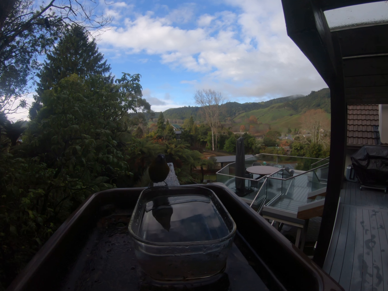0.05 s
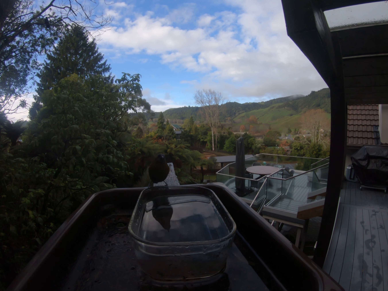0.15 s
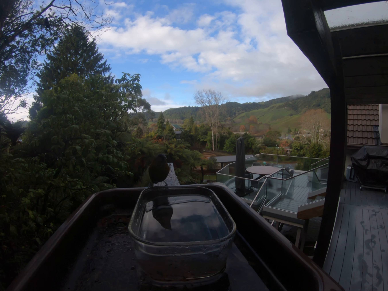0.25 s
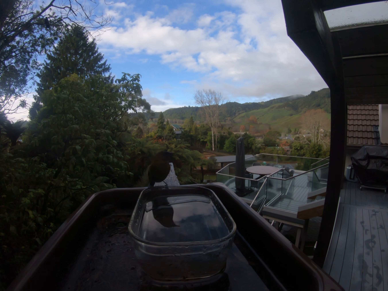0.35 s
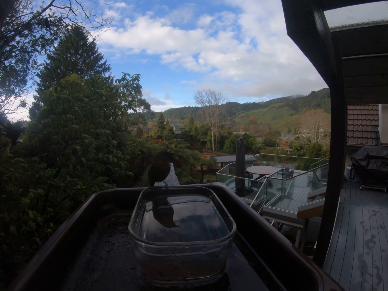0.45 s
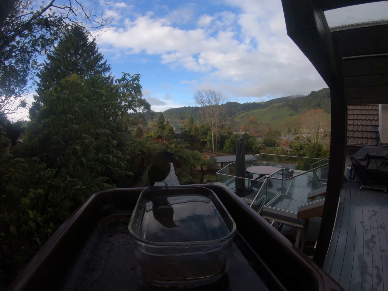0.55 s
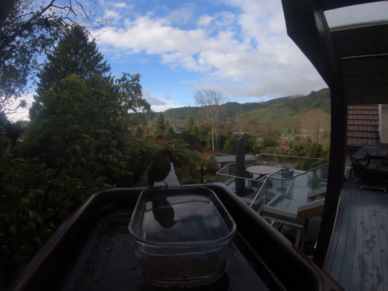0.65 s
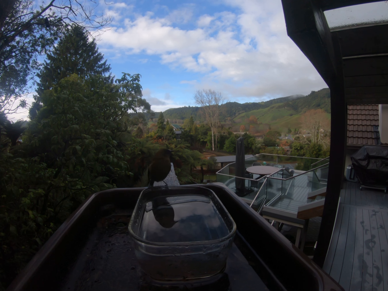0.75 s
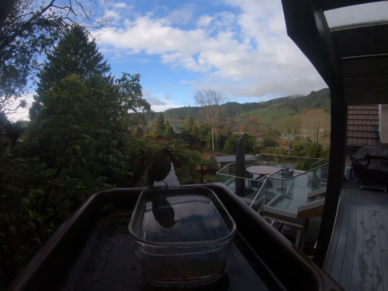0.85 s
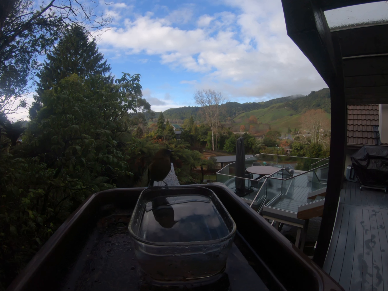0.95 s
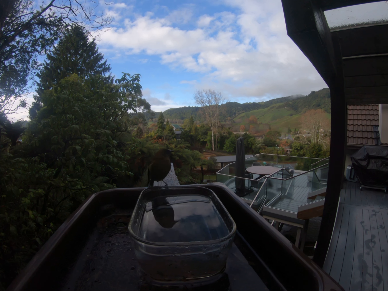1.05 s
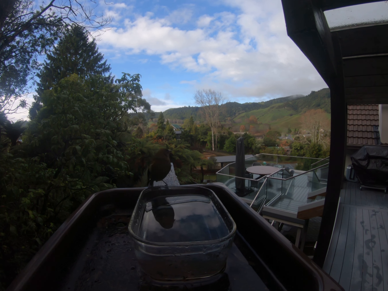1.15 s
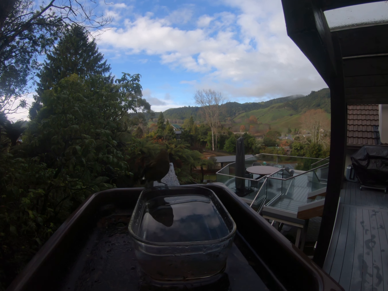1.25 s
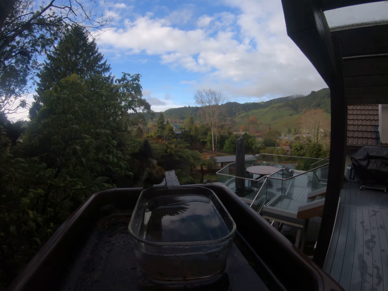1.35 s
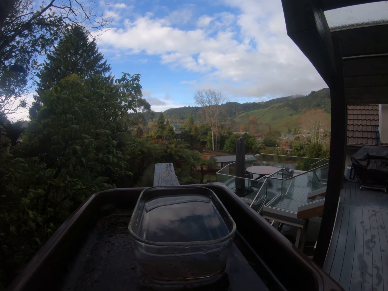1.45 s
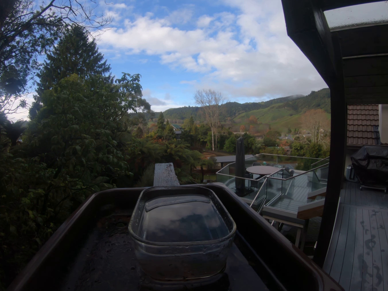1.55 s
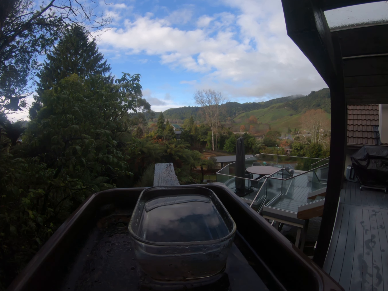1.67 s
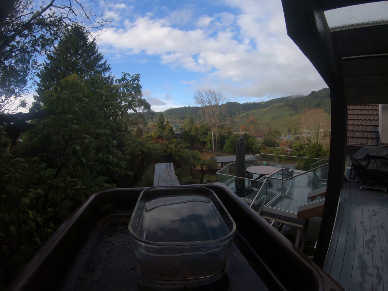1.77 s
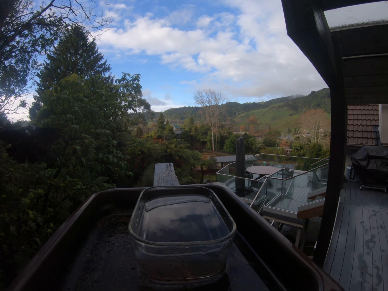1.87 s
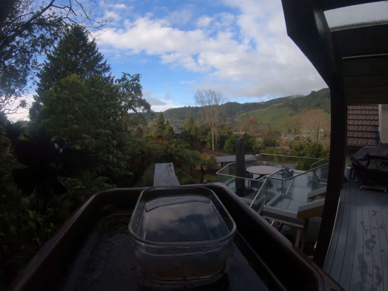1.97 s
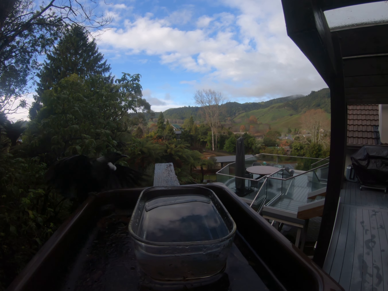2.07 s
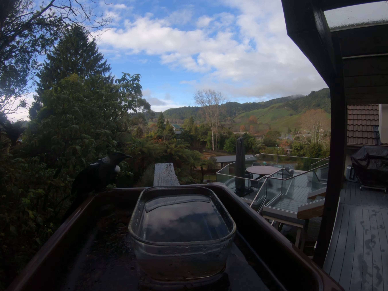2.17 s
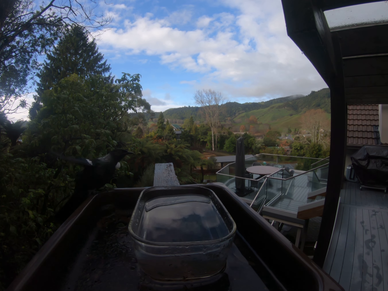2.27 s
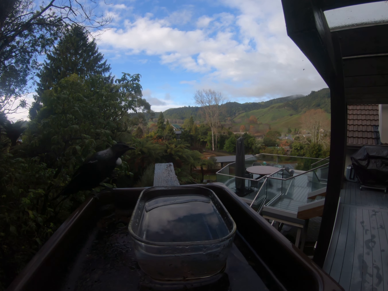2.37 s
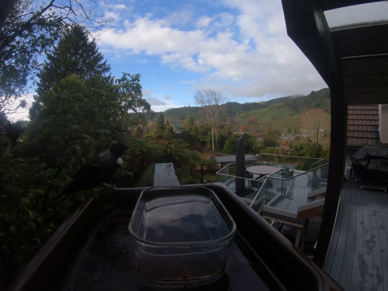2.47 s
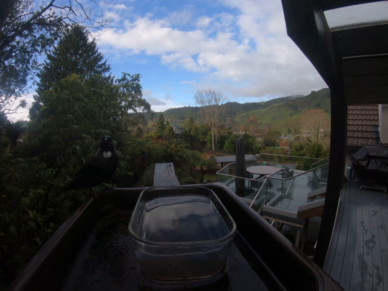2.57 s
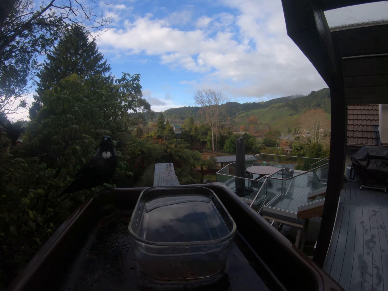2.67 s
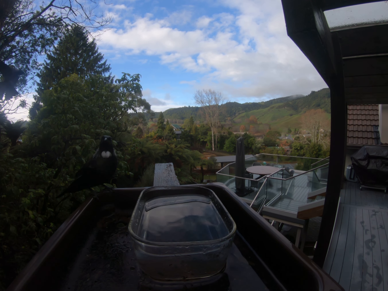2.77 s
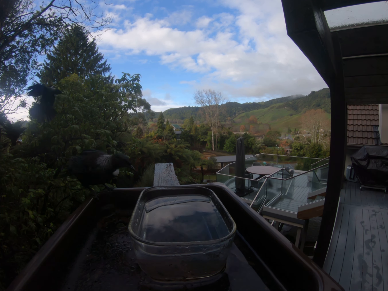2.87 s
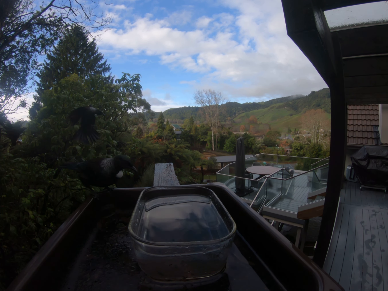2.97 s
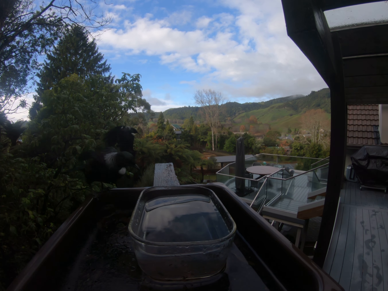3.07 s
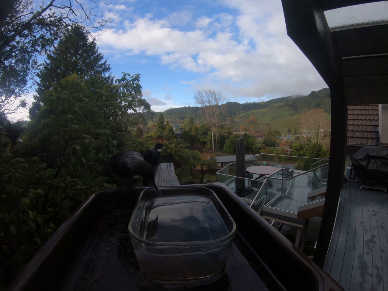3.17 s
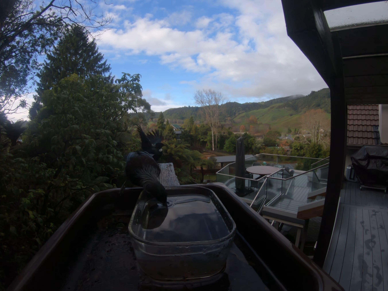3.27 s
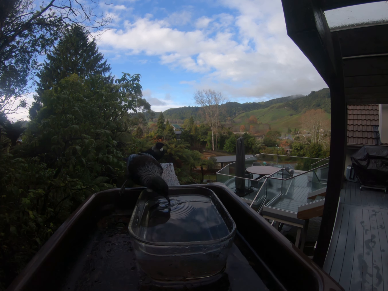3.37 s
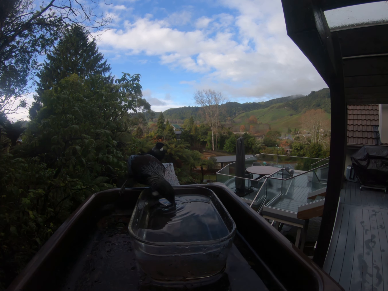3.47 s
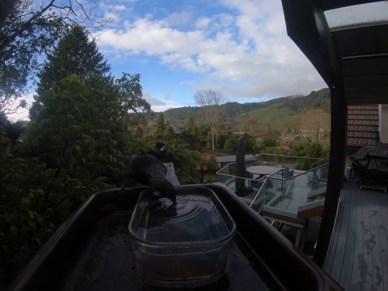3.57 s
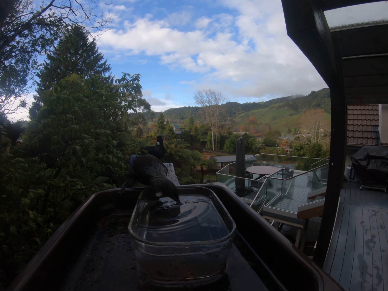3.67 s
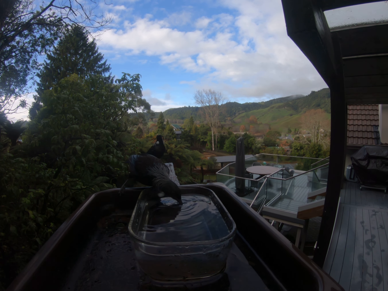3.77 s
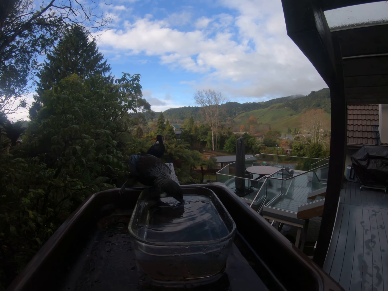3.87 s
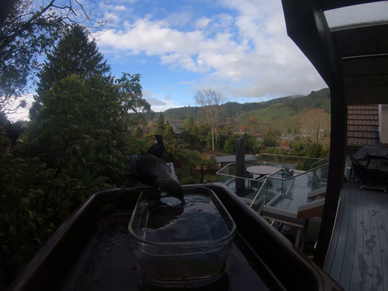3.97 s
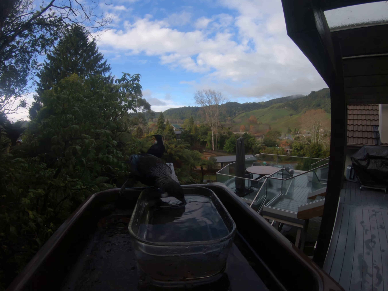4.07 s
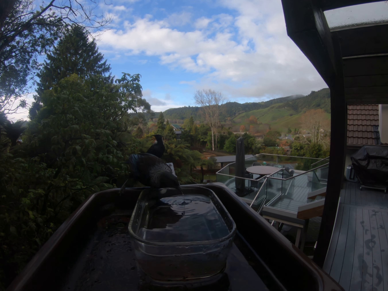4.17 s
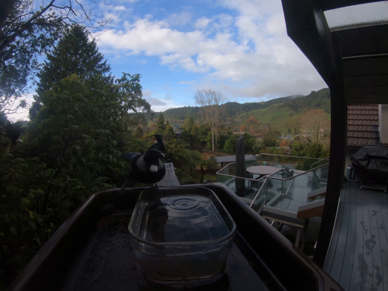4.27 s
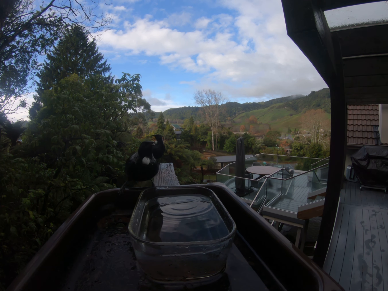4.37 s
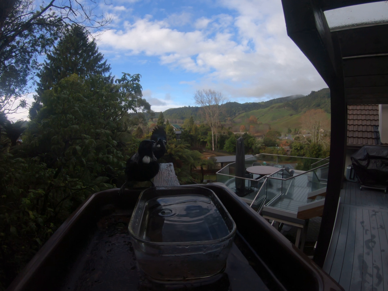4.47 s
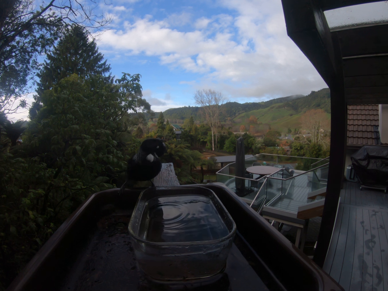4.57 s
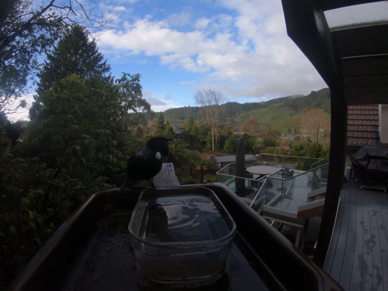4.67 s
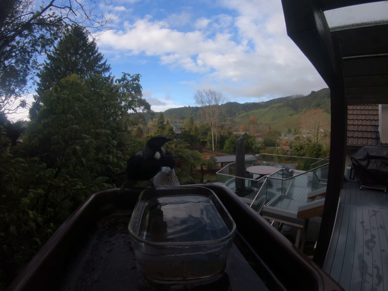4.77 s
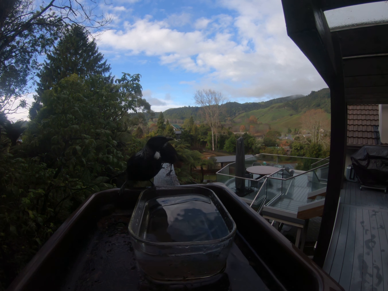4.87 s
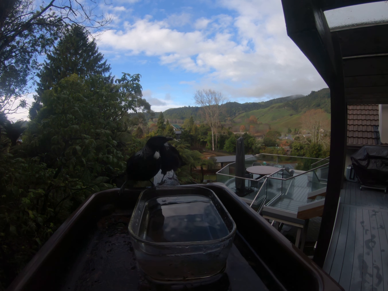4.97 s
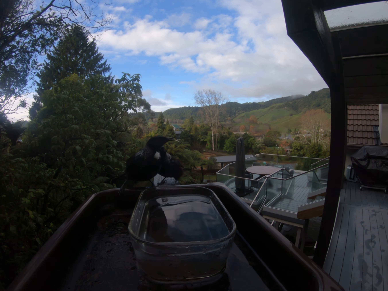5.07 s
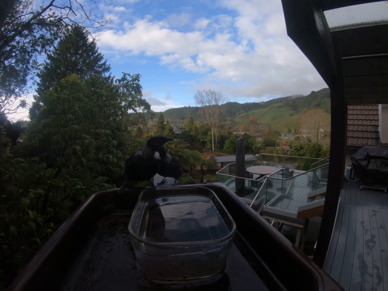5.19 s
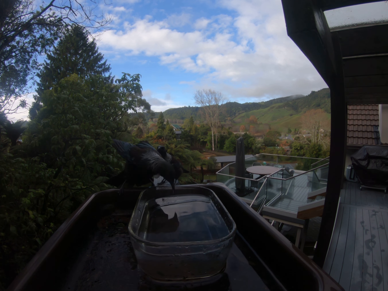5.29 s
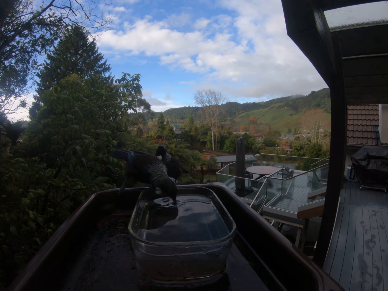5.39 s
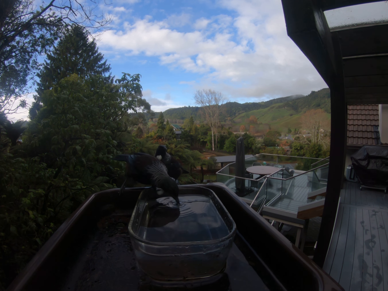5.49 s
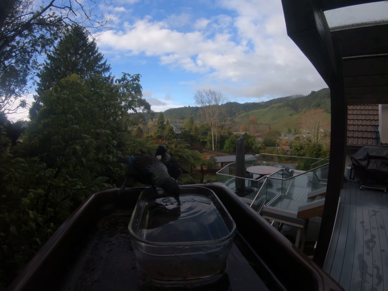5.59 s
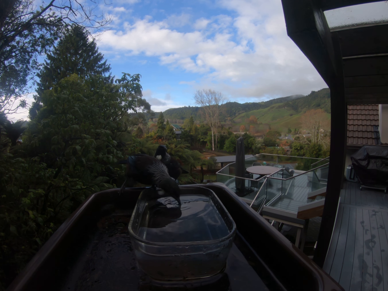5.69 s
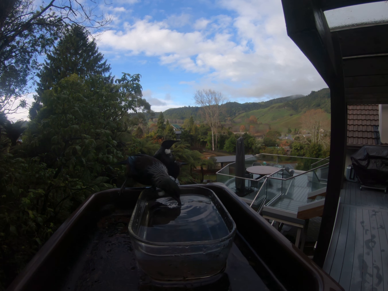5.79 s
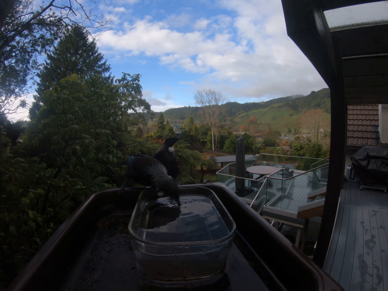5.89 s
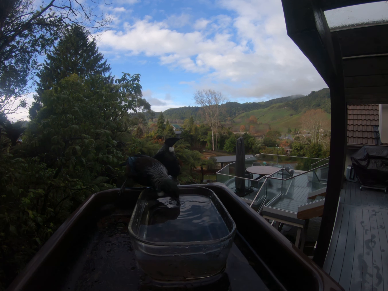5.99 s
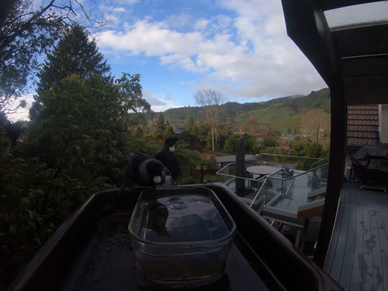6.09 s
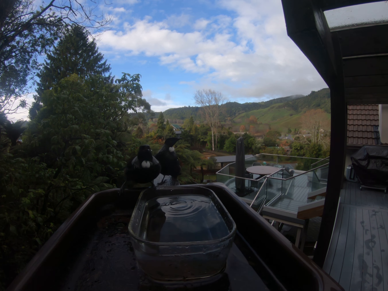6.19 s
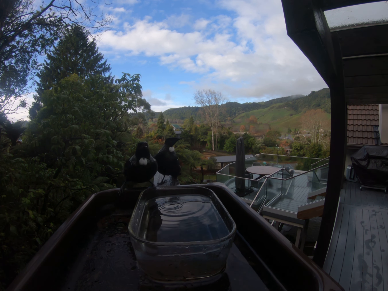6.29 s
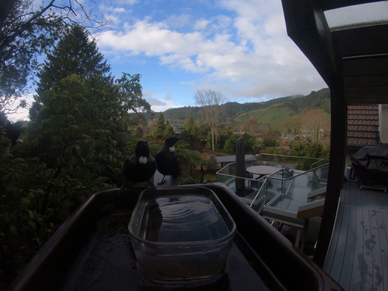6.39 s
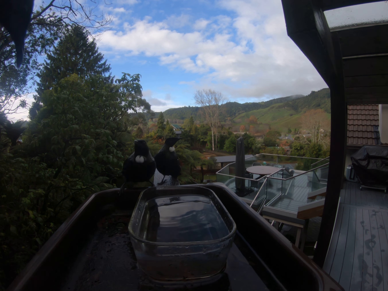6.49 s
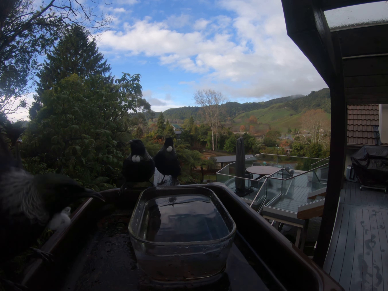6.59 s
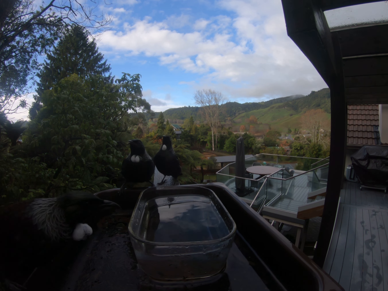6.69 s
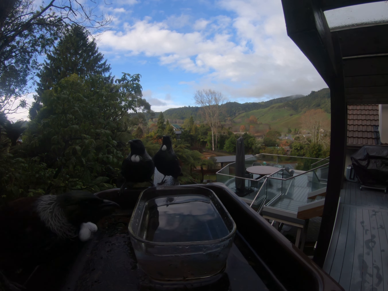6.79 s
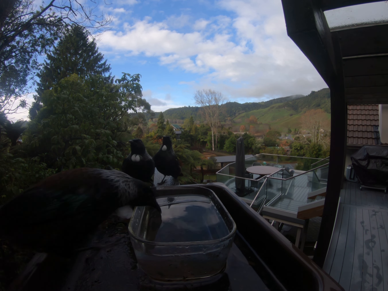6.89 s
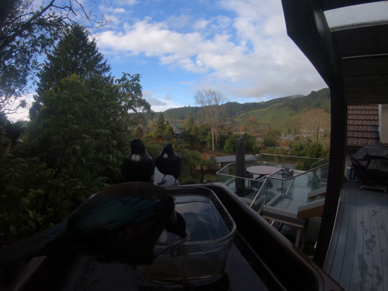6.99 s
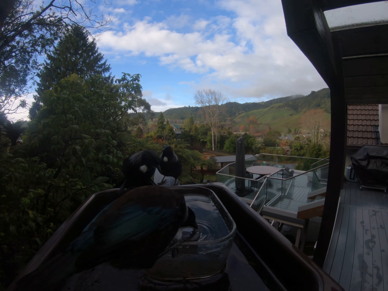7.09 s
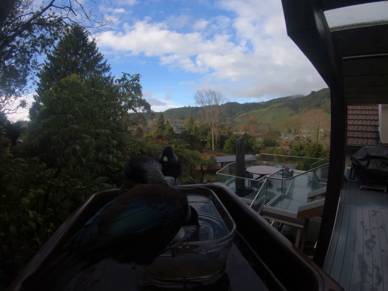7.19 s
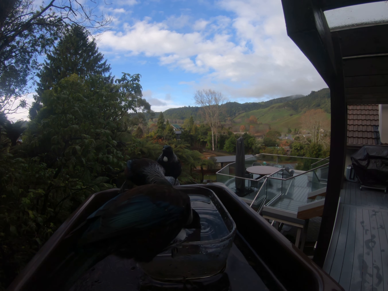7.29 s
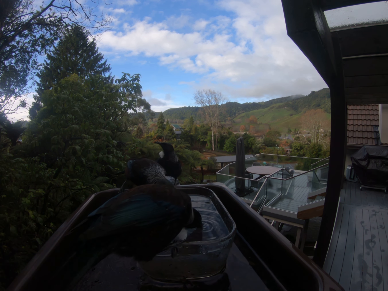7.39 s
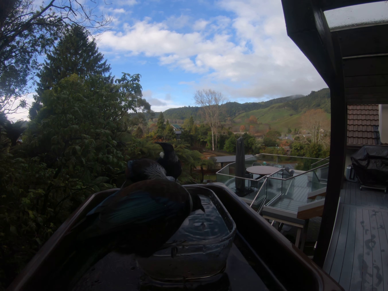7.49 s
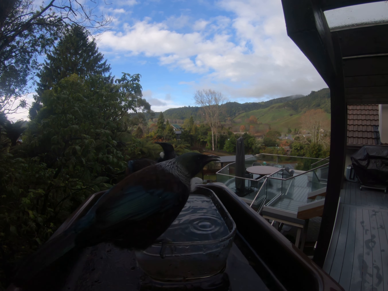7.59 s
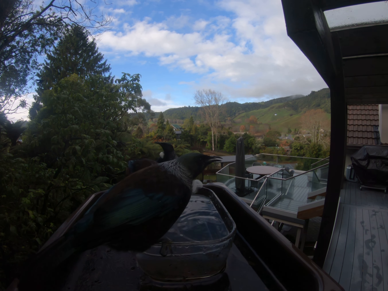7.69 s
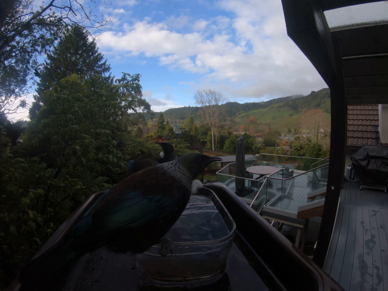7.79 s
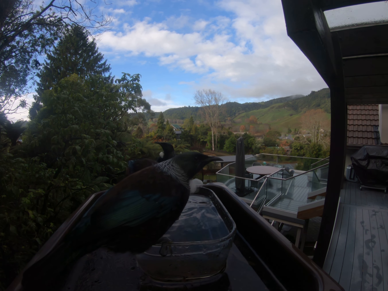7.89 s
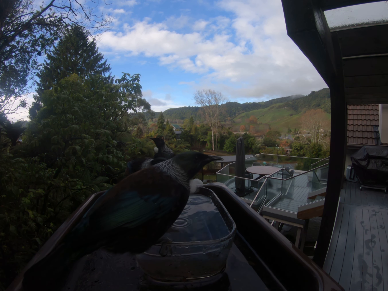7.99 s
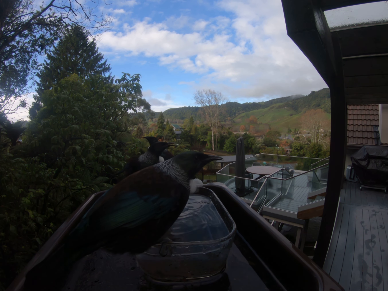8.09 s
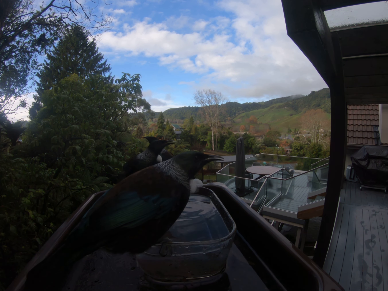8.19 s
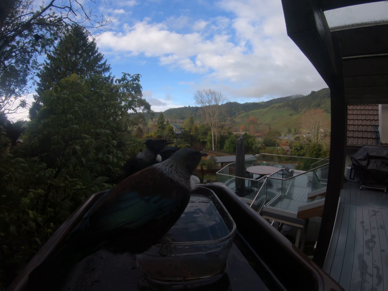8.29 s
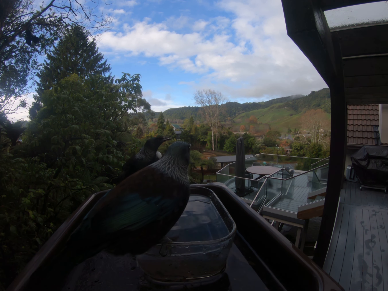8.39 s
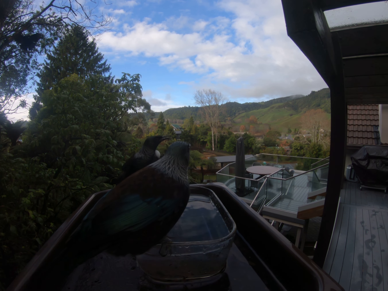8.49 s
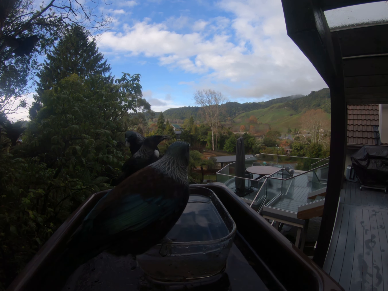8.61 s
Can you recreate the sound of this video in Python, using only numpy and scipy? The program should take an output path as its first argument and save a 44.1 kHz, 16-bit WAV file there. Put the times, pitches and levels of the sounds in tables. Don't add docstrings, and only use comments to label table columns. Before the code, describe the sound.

Very close to a feeder on a quiet wooden deck, faint leaf rustle and thin far peeps. A bird bursts away with feathery wing strokes, foot knocks and quick falling chips. Others flutter in, buffet the microphone and land with thumps. Beaks click and lap rapidly. A wing slaps the microphone with a loud crack, then claws scrape, slow sips continue and far birds flute and shrill.

```python
import sys
import numpy as np
from scipy import signal
from scipy.fft import rfft, irfft, next_fast_len
from scipy.io import wavfile
from scipy.ndimage import uniform_filter1d, map_coordinates

SR = 44100
rng = np.random.default_rng(int(sys.argv[2]) if len(sys.argv) > 2 else 0)


def to_wav(sig):
    pcm = np.clip(np.atleast_2d(sig), -1, 1) * 32767
    pcm = np.round(pcm).astype(np.int16)
    wavfile.write(sys.argv[1], SR, pcm.T)


def gain_from_db(level_db):
    decades = np.asarray(level_db, float) / 20
    return 10 ** decades


N = 381465
T = np.arange(N) / SR


def unit(x):
    return x / np.sqrt(np.mean(x ** 2) + 1e-20)


def along(points, f_hz):
    f, value = np.transpose(points)
    return np.interp(np.log(f_hz + 1), np.log(f + 1), value)


def sides(pan_db):
    return gain_from_db(np.array([pan_db / 2, -pan_db / 2]))


def wobble(rate_hz):
    return map_coordinates(rng.standard_normal(int(N * rate_hz / SR) + 4), [T * rate_hz])


def rush(spectrum, alike, patchy_db):
    z = signal.stft(rng.standard_normal((2, N)), nperseg=256)[2]
    field = uniform_filter1d(rng.standard_normal(z.shape[1:]), size=5, axis=0)
    field = uniform_filter1d(field, size=6, axis=1)
    pair = signal.istft(z * gain_from_db(patchy_db * np.tanh(unit(field))), nperseg=256)[1][:, :N]
    m = next_fast_len(N)
    f_hz = np.fft.rfftfreq(m, 1 / SR)
    turn = np.arccos(np.clip(along(alike, f_hz), -1, 1)) / 2
    gain = gain_from_db(along(spectrum, f_hz)) * [np.cos(turn), np.sin(turn)]
    mid, side = irfft(rfft(pair, m) * gain, m)[:, :N]
    return unit(np.array([mid + side, mid - side]))


def add(out, t_s, sound):
    i = round(t_s * SR)
    out[:, i:i + sound.shape[-1]] += sound[..., :N - i]


def ring(f_hz, t60_s, t, attack_s, lead_rad=0):
    return np.sin(2 * np.pi * f_hz * t + lead_rad) * gain_from_db(-60 * t / t60_s) * (1 - np.exp(-t / attack_s))


def swells(rows, rise_db_s):
    gain = 0
    for s, hold, db, fall_db_s in rows:
        before, after = np.clip(s - T, 0, None), np.clip(T - s - hold, 0, None)
        gain = gain + gain_from_db(db - rise_db_s * before - fall_db_s * after)
    return uniform_filter1d(gain, size=300)


# t/s, stir of leaves and feathers level/dB, breeze level/dB
AIR = [(0, -73, -69.5), (1.15, -68, -68), (1.45, -63.5, -68.5), (1.75, -57, -59.5), (2.25, -56, -64),
       (2.75, -65, -68.5), (3.2, -52.5, -51.5), (3.5, -63, -73.5), (4.1, -61, -68), (4.72, -53.5, -71),
       (4.87, -70.5, -71.5), (5.65, -69, -72.5), (5.9, -57.5, -67.5), (6.15, -67.5, -70.5),
       (6.55, -64.5, -66.5), (6.821, -72, -75), (7.019, -64, -66.5), (8.65, -60.5, -60.5)]
# f/Hz, level/dB per Hz
RUSTLE = [(1060, -3.5), (1800, -2), (2260, 0), (4410, -0.5), (5590, -6.5), (7910, -4), (10400, -21),
          (13000, -40.5)]
# f/Hz, level/dB per Hz
VALLEY = [(190, -13.5), (320, -6), (491, -8), (711, 0), (970, -4.5), (2200, -16), (2860, -47.5),
          (4840, -120)]
# f/Hz, level/dB per Hz
HUM = [(20, -26), (52, -19), (80, -40), (115, -38), (138, -8), (180, 0), (300, -9), (480, -45)]
# f/Hz, left-right likeness
ALIKE_FAR = [(60, 0.38), (200, 0.88), (640, -0.62), (3100, 0.44), (8000, -0.47)]


def background():
    s, *cols = np.transpose(AIR)
    stir_db, breeze_db = (np.interp(T, s, c) for c in cols)
    hum_db = breeze_db + 3.5 + 0.083 * (stir_db - breeze_db)
    leaves = gain_from_db(stir_db + 1.5 + 1.8 * wobble(12)) * rush(RUSTLE, ALIKE_FAR, patchy_db=4.5)
    valley = gain_from_db(breeze_db + 3.5 + 1.5 * wobble(11)) * rush(VALLEY, ALIKE_FAR, patchy_db=2)
    hum = gain_from_db(hum_db + 1.5 * wobble(8)) * rush(HUM, ALIKE_FAR, patchy_db=3)
    return leaves + valley + hum


# f/Hz, level/dB per Hz
SHEEN = [(6000, -43), (8500, 0), (11000, -1.5), (15500, -11), (16500, -38)]
# f/Hz, left-right likeness
ALIKE_NEAR = [(60, -0.19), (250, 1), (1410, -0.053), (3100, 0.67), (10000, -0.66)]


def sheen():
    calm_db, growth = -62, 1.8
    s, stir_db, _ = np.transpose(AIR)
    late_db = -20 * (T > 6.78)
    level_db = -76.5 + late_db + growth * (np.interp(T, s, stir_db) - calm_db) + 2 * wobble(13)
    return gain_from_db(level_db) * rush(SHEEN, ALIKE_NEAR, patchy_db=0.5)


# t/s, peak level/dB, f/Hz
CLICKS = [(.158, -60, 3800), (2.204, -38, 8450), (2.3765, -38.5, 5370), (3.155, -42, 7500),
          (3.196, -39, 7300), (3.226, -45, 6200), (3.244, -31.5, 2810), (3.245, -38, 8000),
          (3.27, -48, 7300), (3.59, -55, 7000), (3.662, -57, 7000), (2.387, -44, 8200), (3.5159, -54, 4500),
          (3.574, -55, 7300), (3.7814, -45, 2870), (4.122, -49, 7600), (4.133, -52, 2500),
          (5.3687, -47, 2880), (5.457, -56, 5000), (5.5373, -49, 6200), (5.5967, -52.5, 2430),
          (5.613, -48.5, 4400), (5.698, -49, 4940), (5.74, -50, 3100), (5.7726, -52, 4510),
          (5.844, -44, 4530), (5.884, -50, 2400), (5.888, -52, 7150), (5.924, -55, 3000),
          (5.949, -56, 7200), (5.959, -41, 2300), (5.9638, -42, 6800), (6.0, -55.5, 7000),
          (6.0347, -47, 4800), (6.043, -56.5, 7400), (6.0575, -58, 6500), (6.108, -45, 2900),
          (6.3535, -47, 3240), (6.377, -56, 5000), (6.4138, -41.5, 4950), (6.419, -48.5, 7100),
          (6.4264, -52, 6000), (6.757, -55, 8000), (7.1788, -57, 3230), (7.207, -68, 7650),
          (7.2586, -57, 5500), (7.3209, -49, 2910), (7.34, -72, 7800), (7.3848, -70, 8000),
          (7.457, -60, 7500), (7.5335, -68, 8200), (7.6203, -60, 2910), (8.5775, -61, 8200),
          (8.6194, -52, 6330), (7.5462, -56, 2880), (7.4886, -65, 6000), (7.89, -51, 7700),
          (8.097, -59, 5500), (8.4184, -56, 6200)]
# t/s, peak level/dB
LAPS = [
    [(.2039, -58), (.2783, -59), (.3544, -56)],
    [(3.566, -45.5), (3.638, -45), (3.709, -46), (3.7735, -44), (3.839, -44), (3.9115, -41), (3.972, -44.5),
     (4.039, -46), (4.097, -50), (4.17, -42.5), (4.2395, -50)],
    [(7.699, -49.5), (7.7735, -50), (7.849, -48.5), (7.9285, -54), (8.0, -61)],
]
# lag/s, level/dB re dip, f/Hz
DRAWS = [(0.035, -6, 3900), (.026, -3.5, 2990), (0.034, 2, 2850)]


def pecks():
    rows = list(CLICKS)
    for bout, (lag_s, less_db, f_hz) in zip(LAPS, DRAWS):
        for s, db in bout:
            for k in range(2):
                rows.append((s + k * lag_s, db + k * less_db, f_hz * np.exp(0.061 * rng.standard_normal())))
    return rows


def beaks():
    out, t = np.zeros((2, N)), np.arange(SR // 16) / SR
    band = signal.butter(3, (1800, 9000), "bandpass", fs=SR, output="sos")
    for s, db, f_hz in pecks():
        snap = signal.sosfilt(band, rng.standard_normal(len(t)) * gain_from_db(-4 - 60 * t / 0.0026))
        tub = gain_from_db(-26) * ring(2900 * rng.normal(1, .04), 0.07, t, 0.00054)
        click = 1.3 * ring(f_hz, 0.0045, t, 0.000067) + snap + tub
        add(out, s, 1.4 * gain_from_db(db) * click * sides(-1.5)[:, None])
    return out


# f/Hz, t60/s
TREES = [(800, 0.9), (2500, 0.9), (3500, 0.4), (8000, 0.2)]


def calls(notes, rough_rad, broken_db, wet):
    dry = np.zeros((1, N))
    for rows in notes:
        s, f_hz, db = np.transpose(rows)
        t = np.arange(s[0], s[-1], 1 / SR)
        edge = np.clip(np.minimum(t - s[0], s[-1] - t) / 0.0013, 0, 1)
        phase = 2 * np.pi * np.cumsum(np.interp(t, s, f_hz)) / SR + rough_rad * wobble(401.2)[:len(t)]
        level_db = np.interp(t, s, db) + broken_db * wobble(58.6)[:len(t)]
        add(dry, s[0], 1.98 * gain_from_db(level_db) * edge * np.sin(phase))
    f_hz, t, z = signal.stft(rng.standard_normal((2, SR // 2)), SR, nperseg=256)
    tail = signal.istft(z * gain_from_db(-60 * t / along(TREES, f_hz)[:, None]), SR, nperseg=256)[1]
    echo = signal.fftconvolve(dry, tail / np.linalg.norm(tail[0]), axes=1)[:, :N]
    return dry + wet * gain_from_db(4 * wobble(22)) * echo


# start t/s, end t/s, start f/Hz, end f/Hz, level/dB
PEEPS = [(0.955, 1.03, 7450, 7150, -81), (1.03, 1.16, 7150, 7080, -85), (0.78, 0.9, 4500, 4600, -88),
         (.81, .99, 4200, 3950, -86), (.79, .86, 8200, 7900, -89), (.49, .545, 310, 295, -67),
         (.545, .6, 295, 170, -67), (.88, .97, 1040, 1030, -80), (.8, .85, 760, 860, -79),
         (7.53, 7.66, 2830, 2900, -76), (1.86, 1.885, 6700, 6720, -73), (1.915, 1.96, 6680, 6620, -71),
         (4.76, 4.914, 4250, 4180, -78), (5.145, 5.18, 5300, 5550, -81), (5.18, 5.25, 5550, 5620, -78),
         (5.21, 5.25, 7000, 7010, -83), (5.13, 5.24, 4150, 4250, -84), (5.635, 5.7, 6900, 6800, -86),
         (5.63, 5.68, 5350, 5550, -82), (5.3, 5.335, 2430, 2420, -74), (5.722, 5.785, 3430, 3540, -70),
         (6.148, 6.385, 4050, 4030, -79)]


def peeps():
    notes = [[(a, start_hz, db), (b, end_hz, db)] for a, b, start_hz, end_hz, db in PEEPS]
    return calls(notes, rough_rad=.4, broken_db=3.5, wet=.4)


# centre t/s, half length/s, feather level/dB, whoosh level/dB re feather, left-right level/dB
RUFFLES = [(.565, 0.033, -67.5, 8, -4), (.69, 0.031, -81, 12, -10), (1.149, 0.034, -66, -5, 0),
           (1.379, 0.018, -45, -11, -4), (2.225, 0.031, -46, -13, -2.5), (4.826, 0.0075, -71.5, 16.5, 1),
           (4.79, 0.028, -64.5, 8, -7), (6.596, 0.011, -36, -4.5, 8), (7.115, 0.025, -72.5, 15.5, -6),
           (2.615, 0.018, -67.5, -23, 20), (2.345, 0.028, -53.5, -11, -1),
           (2.41, 0.049, -54.5, -18.5, -4.5), (3.407, 0.049, -57.5, -6, -3.5),
           (5.082, 0.043, -62.5, 2.5, -1), (5.405, 0.17, -69.5, -1.5, -2), (5.955, 0.068, -68, -2, -4),
           (6.242, 0.034, -56.5, -29, 4), (6.304, 0.037, -65.5, -9, 2), (6.757, 0.0093, -61.5, -11, -17),
           (7.034, 0.019, -48, -11, -5), (7.39, 0.023, -80, -20, 1), (8.63, 0.013, -54, -21, 3)]
# centre t/s, half length/s, feather level/dB
FLIGHTS = [
    [(1.288, 0.03, -69.5), (1.339, 0.047, -62.5), (1.446, 0.03, -50), (1.498, 0.023, -51),
     (1.547, 0.016, -57), (1.6, 0.045, -59.5)],
    [(1.956, 0.032, -54), (2.052, 0.028, -45), (2.148, 0.047, -46)],
    [(2.7, 0.043, -55), (2.806, 0.043, -50), (2.912, 0.044, -49), (3.013, 0.038, -47), (3.088, 0.029, -51),
     (3.162, 0.045, -43.5), (3.206, 0.019, -45.5), (3.251, 0.032, -47)],
    [(4.128, 0.023, -56), (4.213, 0.043, -56), (4.314, 0.039, -53.5), (4.391, 0.026, -49),
     (4.471, 0.045, -47), (4.583, 0.022, -48), (4.657, 0.046, -45), (4.743, 0.023, -48)],
    [(6.522, 0.027, -55), (6.63, 0.027, -59), (6.675, 0.019, -52)],
]
# first, last left-right level/dB; first, last whoosh level/dB re feather
PATHS = [(-0.5, -1.5, 5.5, 7), (2, 0, -1.5, 1), (5.5, -3, -4, 0), (4.5, 8.5, -8.5, 6), (15, 0, -2, 10)]
# f/Hz, level/dB per Hz
FEATHER = [(900, -1.5), (1500, 2), (2070, -7), (3290, 0.5), (5700, -4.5), (8500, -0.5), (11000, -7.5),
           (16500, -14.5)]
# f/Hz, level/dB per Hz
WHOOSH = [(100, -47), (170, 2.5), (300, -0.5), (550, -4.5), (900, -5), (1500, -9), (2300, -15), (4000, -28)]


def strokes():
    rows = list(RUFFLES)
    for beats, (pan_db, end_pan_db, low_db, end_low_db) in zip(FLIGHTS, PATHS):
        ends = beats[0][0], beats[-1][0]
        for s, half, db in beats:
            whoosh_db = np.interp(s, ends, (low_db, end_low_db))
            rows.append((s, half, db, whoosh_db, np.interp(s, ends, (pan_db, end_pan_db))))
    return rows


def wings():
    edge_power, whoosh_lead = 4 - 1, 0.24
    hiss, push = np.zeros((2, 2, N))
    for s, half, db, low_db, pan_db in strokes():
        t = np.arange(-3 * half, 3 * half, 1 / SR)
        swell = np.exp(-np.abs(t / half) ** edge_power) * sides(pan_db)[:, None]
        add(hiss, s - 3 * half, gain_from_db(db - 1.0) * swell)
        add(push, s - (3 + whoosh_lead) * half, gain_from_db(db + low_db + 1.0) * swell)
    flutter = wobble(140)
    slip = gain_from_db(1.5 * flutter + 2.6 * wobble(500))
    throb = gain_from_db(flutter + 1.5 * wobble(90))
    hiss = hiss * slip * rush(FEATHER, ALIKE_NEAR, patchy_db=5.5)
    return hiss + push * throb * rush(WHOOSH, ALIKE_NEAR, patchy_db=8.5)


# t/s, peak level/dB, thud f/Hz, ring level/dB, scratch level/dB
STEPS = [(1.32, -45, 1220, -6, -24), (1.4, -24.5, 1234, -13.5, -17.5), (1.474, -26.5, 660, -27, -8.5),
         (2.033, -41, 800, -36, -17), (2.11, -19.5, 894, -10, -8.5), (2.453, -32.5, 1790, -11, -1.5),
         (3.267, -40, 606, -15, -20), (2.52, -50.5, 1010, -13.5, -10), (3.323, -42, 1500, -27, -7.5),
         (3.383, -36.5, 1270, -25, -12.5), (4.43, -30, 593, -19, -22.5), (4.4288, -32, 1205, -40, -19),
         (3.726, -55, 870, -22, -13), (5.905, -56, 1590, -23, -21), (6.738, -51, 834, -12.5, -20),
         (4.65, -30.5, 385, -24, -19), (5.393, -55.5, 1710, -5, 0), (5.439, -48.5, 580, -24, -10),
         (6.28, -46, 1630, -18.5, -6), (6.494, -47.5, 1710, -15, -12), (6.663, -36, 1840, -6, -9.5),
         (7.013, -50, 1020, -18, -16), (3.122, -44.5, 900, -24, -4), (7.023, -39.5, 2080, -26, -10),
         (7.134, -50, 2130, -10, -13.5), (7.262, -52.5, 620, -10, -18), (7.661, -35.5, 1310, -10, -22),
         (7.949, -49, 587, -19, -21), (8.419, -46.5, 900, -10.5, -7)]
# f/Hz, level/dB, t60/s
TRAY = [(774, -10, .12), (1434, -6, 0.12), (1655, -1, 0.13), (1810, -6, .12), (1871, 1, 0.2),
        (2345, -9, 0.12), (2813, -5, 0.12), (3950, -7, 0.12), (4080, -11, 0.15), (4600, -14, .08),
        (6050, -15, .08), (7010, -16, .08)]
# f/Hz, level/dB per Hz
KNOCK = [(250, -3), (600, -6.5), (1000, -2), (2100, -8.5), (3000, -8.5), (6000, -13.5), (9000, -21.5),
         (15000, -32)]


def tray():
    port_lead_rad = np.array([[2], [0]])
    out, t = np.zeros((2, N)), np.arange(SR // 3) / SR
    grit = rush(KNOCK, [(1000, 0.61)], patchy_db=5.0)
    for s, db, f_hz, ring_db, scratch_db in STEPS:
        t60_s = 0.0064 * gain_from_db(-0.83 * scratch_db)
        modes = 0
        for mode_hz, level_db, fade_s in TRAY:
            mode = gain_from_db(level_db + rng.normal(0, 2.5)) * ring(mode_hz, fade_s, t, .0015, port_lead_rad)
            modes = modes + mode * gain_from_db(3.5 * wobble(70)[:len(t)])
        i = round(s * SR)
        claw = grit[:, i - len(t):i] * (gain_from_db(5.5 - 60 * t / 0.03) + gain_from_db(-6.5 - 60 * t / 0.25))
        claw = claw * (1 - np.exp(-t / .0012))
        thud = ring(f_hz, t60_s, t, 0.00018) + 0.5 * ring(f_hz * 0.62, 0.0068, t, 0.00035)
        thud = thud + ring(3040, 0.0067, t, 0.00034) / 2
        step = 1.3 * thud * sides(-1.8)[:, None] + gain_from_db(ring_db - 8.5) * modes * sides(-12)[:, None]
        add(out, s, gain_from_db(db) * (step + gain_from_db(scratch_db) * claw))
    return out


def sympathy(near):
    hum = 0
    for f_hz, db, t60_s in TRAY:
        hum = hum + gain_from_db(db / 2) * signal.lfilter(*signal.iirpeak(f_hz, f_hz * t60_s / 5, SR), near)
    return gain_from_db(4) * hum


# t/s, hold/s, level/dB, fall/dB/s
GUSTS = [(1.476, 0.1, -39, 224), (2.08, 0.1, -47.5, 500), (3.14, 0.088, -54, 900),
         (4.618, 0.028, -42.5, 146), (4.71, 0.043, -34, 482), (1.39, .03, -61, 300), (1.95, .04, -56, 300),
         (5.25, .05, -75, 150), (7.82, .06, -72, 150), (5.66, .06, -72, 120), (5.88, .02, -67, 200),
         (6.52, .06, -58, 899), (6.604, 0.0015, -23.5, 8983.5)]
# f/Hz, level/dB per Hz
BUFFET = [(10, -17.5), (25, 6.5), (50, -6.5), (100, -8.5), (250, -16), (600, -64.5)]


def downwash():
    lumps = gain_from_db(5.1 * wobble(35) - 0.5)
    return swells(GUSTS, rise_db_s=905) * lumps * rush(BUFFET, [(40, 0.91), (200, 1.0)], patchy_db=-1.5)


# t/s, level/dB, twist level/dB (favours the outer modes)
JOLTS = [(1.405, -46, -8), (2.114, -46, 13.5), (2.452, -40, -2), (3.17, -33.5, 2.5), (3.387, -49.5, -7),
         (4.432, -43.5, -10), (4.741, -38, 8), (5.069, -40.5, -2.5), (5.953, -54, 13.5), (6.285, -47, -7),
         (6.668, -43, 8.5), (7.019, -63, 10.5)]
# f/Hz, t60/s
MOUNT = [(108, 0.26), (180, 0.37), (248, 0.17)]
# t/s, hold/s, level/dB, fall/dB/s
SWAY = [
    (3.24, .11, -46, 400),
    (4.76, .01, -46, 108),
    (6.65, 0.011, -32.5, 59),
    (7.25, .01, -81, 4),
]


def mount():
    port_lead_rad = np.array([[1.83], [0]])
    out, t = np.zeros((2, N)), np.arange(SR // 2) / SR
    for s, db, twist_db in JOLTS:
        low_db = db - 29 + twist_db + 30 * (s > 6.6)
        levels_db = low_db, db, db + twist_db
        for level_db, (f_hz, t60_s) in zip(levels_db, MOUNT):
            add(out, s, gain_from_db(level_db + 4) * ring(f_hz, t60_s, t, .009, port_lead_rad))
    sway = gain_from_db(1.5 * wobble(25)) * swells(SWAY, rise_db_s=400)
    sway = sway * np.sin(2 * np.pi * 58.5 * T + 1.4 * wobble(14))
    return (out + sway) * gain_from_db([[-8], [4]])


# t/s, level/dB
CHIPS = [
    (1.541, -46.5),
    (1.592, -47),
    (1.637, -58),
]


def chips():
    notes = [[(s, 6200, db - 11), (s + 0.00564, 2900, db)] for s, db in CHIPS]
    return calls(notes, rough_rad=.2, broken_db=1, wet=.2)


# t/s, f/Hz, level/dB
WARBLE = [
    [(5.17, 3160, -77), (5.195, 2735, -74), (5.235, 2764, -76), (5.272, 4500, -73), (5.315, 3730, -72),
     (5.34, 3350, -77)],
    [(5.238, 3660, -77), (5.255, 4480, -75), (5.275, 4750, -73), (5.3, 4450, -75)],
    [(5.87, 4800, -71), (5.885, 3900, -71), (5.935, 3880, -73)],
    [(5.895, 4400, -75), (5.91, 4750, -71), (5.925, 4350, -75), (5.94, 4750, -70), (5.95, 4400, -67),
     (5.972, 4400, -67), (5.982, 4000, -70), (6.025, 3680, -73)],
]


def warble():
    return calls(WARBLE, rough_rad=.35, broken_db=3, wet=.8)


# f/Hz, left level/dB, right level/dB
CRACK = [(1690, -3.5, -3), (3410, 2, -6.5), (4350, -1, -9), (5800, -6.5, -22), (6350, -13.5, -23.5),
         (8000, -10, -14), (10000, -15.5, -24), (13570, -18.5, -28.5)]


def slap():
    hit_s, peak_s = 6.608, .0015
    out, t = np.zeros((2, N)), np.arange(SR // 8) / SR
    touch = np.exp(-((t - peak_s) / .00056) ** 2)
    shell = 0
    for f_hz, *db in CRACK:
        drift = np.cumsum(rng.random((2, 1)) * [[1], [.25]], axis=0)
        shell = shell + gain_from_db(db)[:, None] * np.sin(2 * np.pi * (f_hz * t + drift))
    after = gain_from_db(-25 - 60 * np.abs(t - peak_s) / 0.022) * (t > peak_s)
    add(out, hit_s - peak_s, touch * (shell * 0.54 - np.array([[.3], [0]])) + after * shell)
    turns = .5 * (t / .003) ** .48
    swing = -np.sin(2 * np.pi * turns) * np.exp(-t / 0.013) * (1 - np.exp(-t / 0.00034))
    late = np.sin(2 * np.pi * 42 * t) * np.exp(-t / 0.011) * (1 - np.exp(-t / .004))
    add(out, hit_s + 0.00066, swing * np.array([[.75], [.03]]) + late * np.array([[.01], [.2]]))
    return out


# centre t/s, half length/s, level/dB
RUBS = [
    (7.035, 0.0079, -49),
    (7.13, .008, -62),
    (7.683, 0.01, -55),
    (7.771, 0.014, -61),
]
# f/Hz, level/dB
RIM = [(2110, 3), (3670, -3), (5650, -2), (9050, -6.5)]


def rim():
    swell = sum(gain_from_db(db) * np.exp(-((T - s) / half) ** 2) for s, half, db in RUBS)
    modes = 0
    for f_hz, db in RIM:
        modes = modes + gain_from_db(db + 3.5 * wobble(150)) * np.sin(2 * np.pi * f_hz * T + 1.1 * wobble(600))
    return swell * modes


RASP = 7.37, 7.42, -73, (2750, 3350, 3900, 4350, 4900, 5350)


def rasp():
    start_s, end_s, db, partials_hz = RASP
    notes = [[(start_s, f_hz, db), (end_s, f_hz, db)] for f_hz in partials_hz]
    return calls(notes, rough_rad=1.3, broken_db=5, wet=.2)


# t/s from first step, f/Hz, level/dB
FLUTE = [(-.06, 2320, -14), (-.012, 2262, -3), (-.004, 1891, -0.5), (.008, 1598, 4), (0.055, 1555, 0.5),
         (.064, 1420, -6), (.078, 1106, -12)]
# first step t/s, stretch, level/dB
PHRASES = [
    (7.466, 1.15, -59),
    (7.906, 1.3, -55),
]


def flutes():
    notes = [[(s + stretch * t, f_hz, db + level) for t, f_hz, level in FLUTE] for s, stretch, db in PHRASES]
    return calls(notes, rough_rad=.35, broken_db=3, wet=.8)


# start t/s, length/s, level/dB, first flick f/Hz
SHRILL = [
    (8.092, 0.25, -56, 850),
]


def shrills():
    flick_s, sag_hz_s = .031, 1900
    notes = []
    for s, length, db, flick_hz in SHRILL:
        t = np.arange(0, length, .001)
        level_db = db - 6 * (2 * t / length - 1) ** 2
        flick = flick_hz * np.exp(-((t - .055) / .04) ** 2) * np.cos(np.pi * t / flick_s) ** 10
        lower_hz = 4150 - sag_hz_s * t - 1600 * np.exp(-t / 0.009)
        upper_hz = 4700 - sag_hz_s * t + flick
        sounding = (t > .8 * flick_s) & (t < .65 * length)
        notes.append(np.c_[s + t, lower_hz, level_db])
        notes.append(np.c_[s + t, upper_hz, level_db - 1.5][sounding])
    return calls(notes, rough_rad=1.1, broken_db=4, wet=.9)


def scene():
    small = signal.butter(4, 140, "highpass", fs=SR, output="sos")
    near = signal.sosfilt(small, beaks() + wings() + tray() + rim())
    birds = peeps() + chips() + warble() + rasp() + flutes() + shrills()
    return background() + sheen() + near + sympathy(near) + downwash() + mount() + slap() + birds


def band_limit(x):
    return signal.sosfilt(signal.butter(12, 16660, fs=SR, output="sos"), x)


# t/s, side level/dB
WIDTH = [(6.68, -1), (7.0, -13.5), (7.4, -34)]
# f/Hz, level/dB
MIC = [(10200, -0.5), (11400, -8.5), (16000, -9.5)]


def record(dry):
    mid = (dry[0] + dry[1]) / 2
    side = (dry[0] - dry[1]) / 2 * gain_from_db(np.interp(T, *np.transpose(WIDTH)))
    dry = np.array([mid + side, mid - side])
    held = dry / (1 + np.abs(dry / .95) ** 6) ** (1 / 6)
    f_hz = np.fft.rfftfreq(N, 1 / SR)
    kept = irfft(rfft(held) * gain_from_db(along(MIC, f_hz)) * (f_hz < 16600), N)
    return band_limit(kept)


dry = scene()
out = record(dry)
to_wav(out)
```